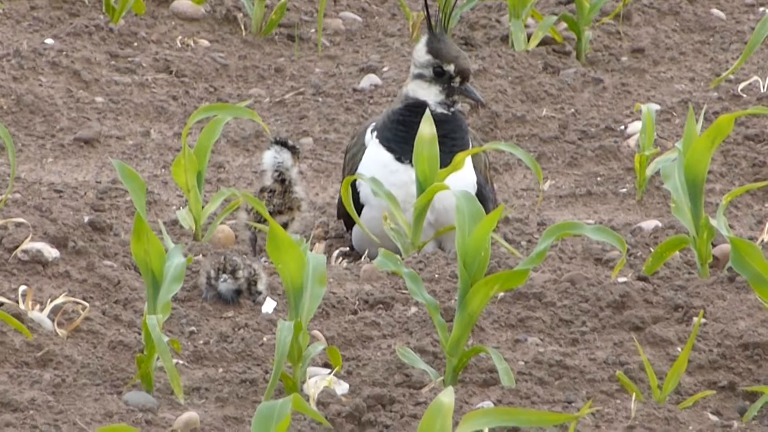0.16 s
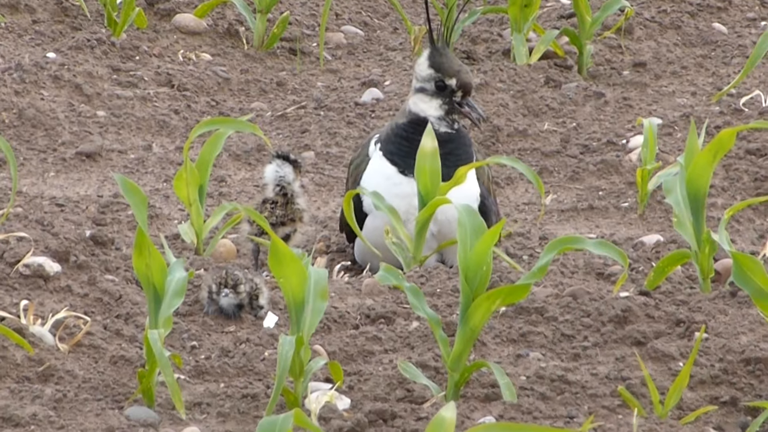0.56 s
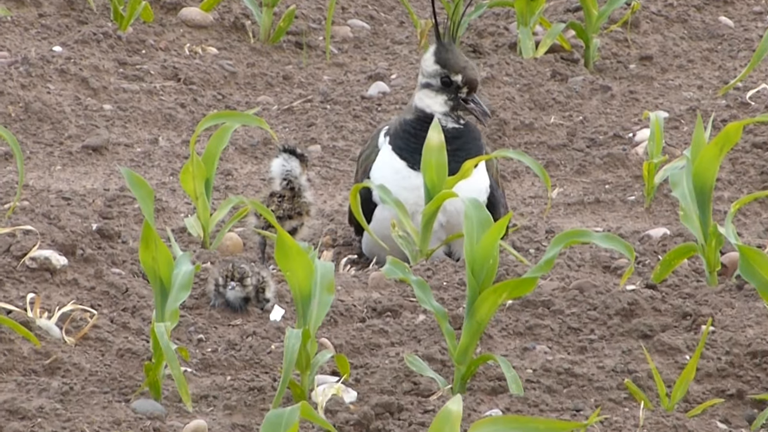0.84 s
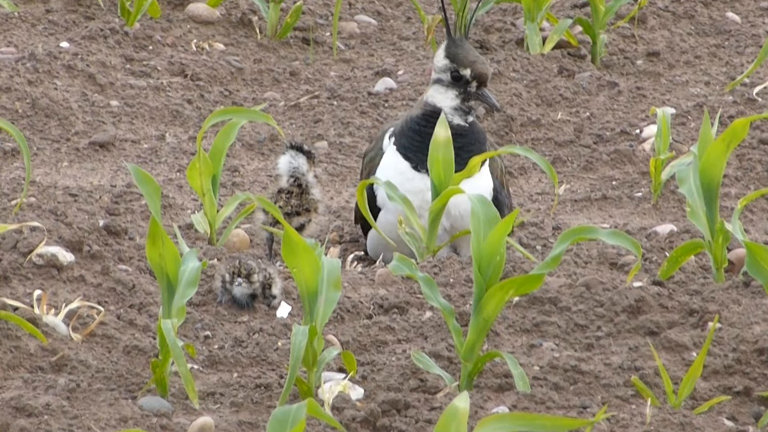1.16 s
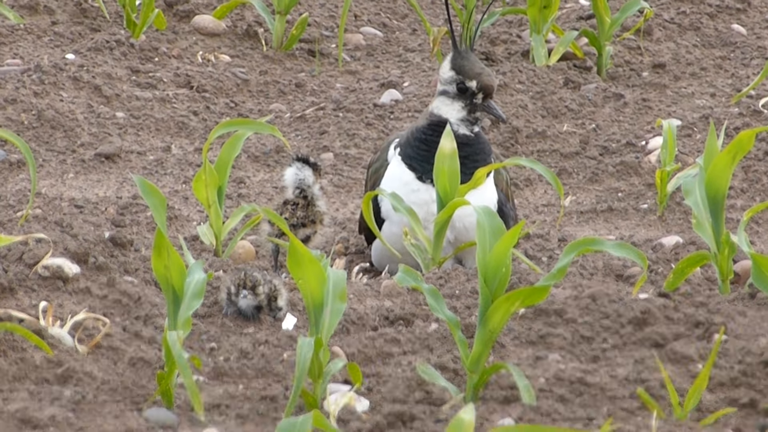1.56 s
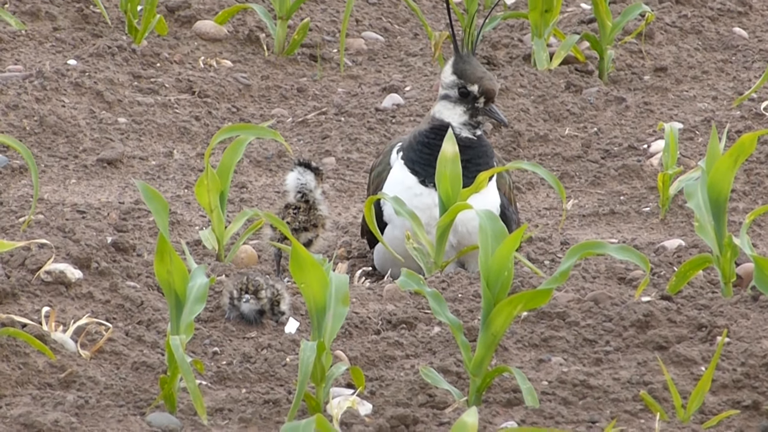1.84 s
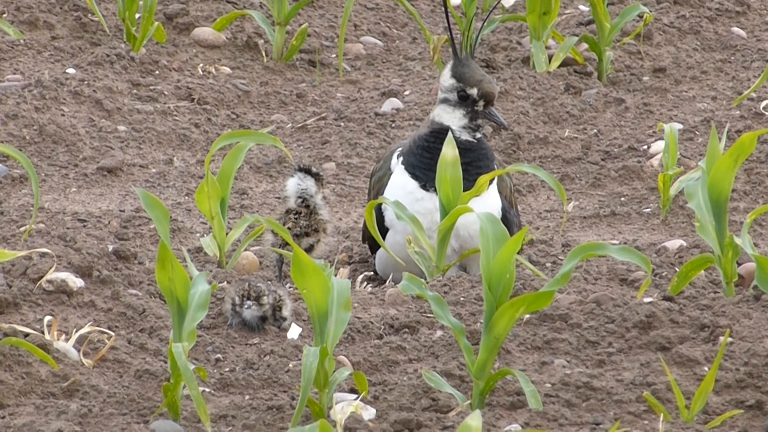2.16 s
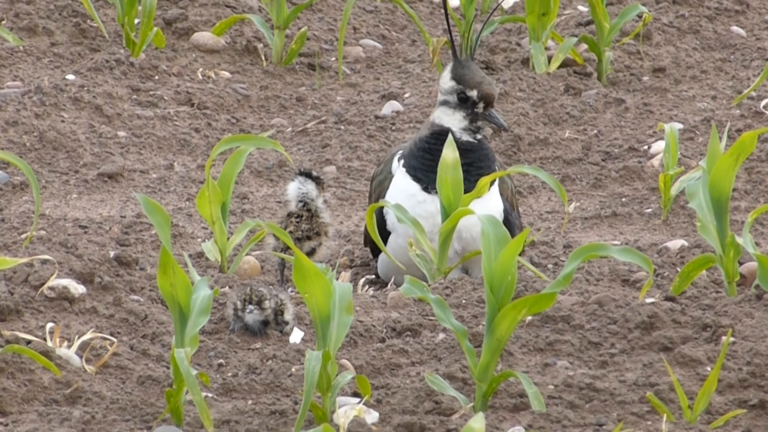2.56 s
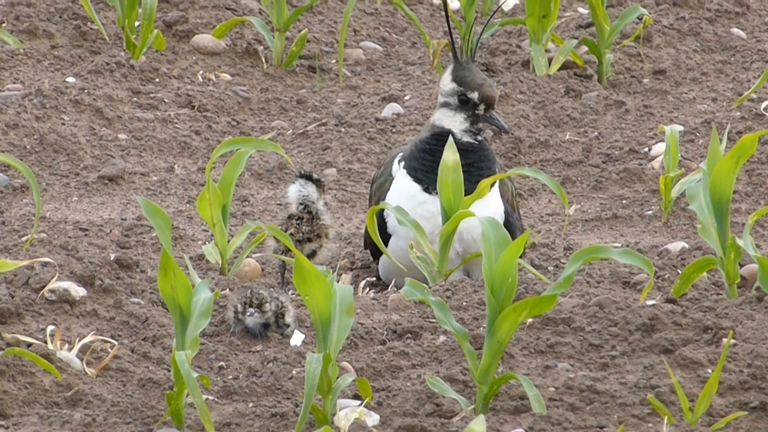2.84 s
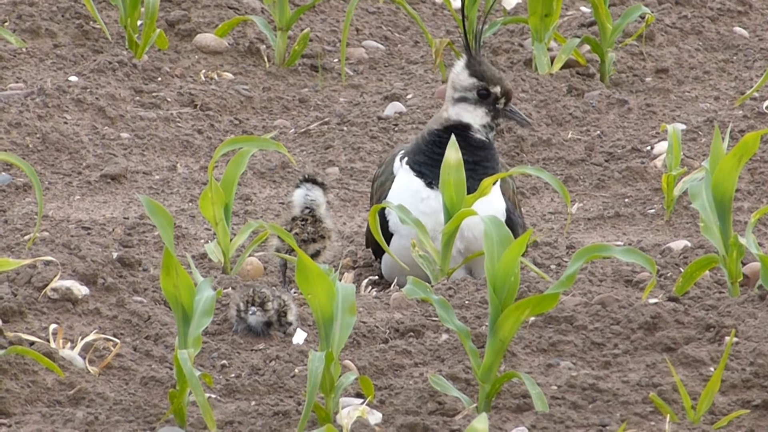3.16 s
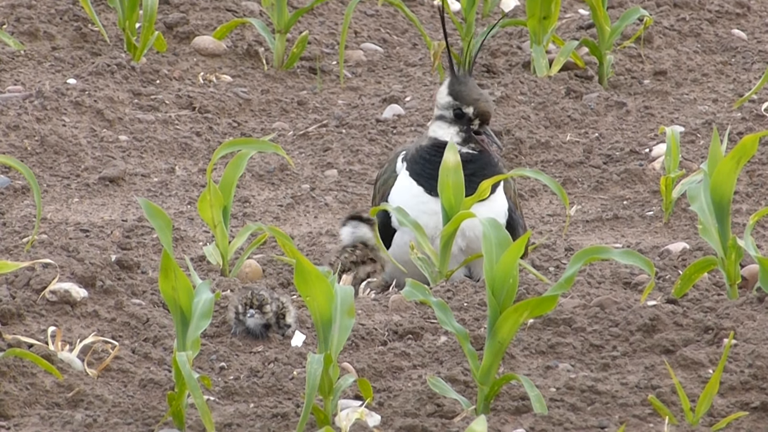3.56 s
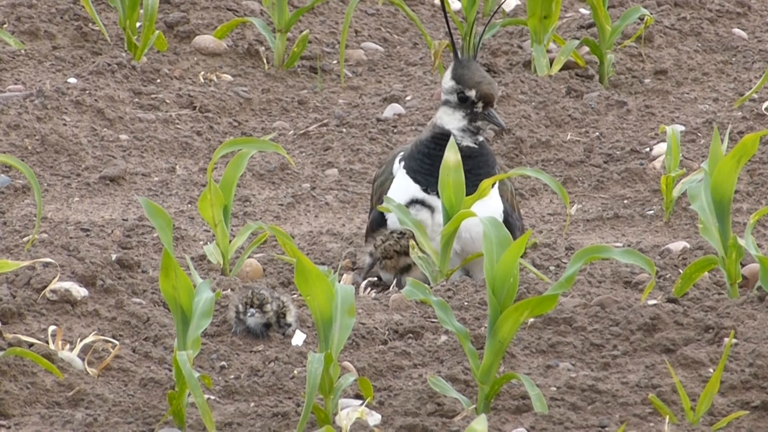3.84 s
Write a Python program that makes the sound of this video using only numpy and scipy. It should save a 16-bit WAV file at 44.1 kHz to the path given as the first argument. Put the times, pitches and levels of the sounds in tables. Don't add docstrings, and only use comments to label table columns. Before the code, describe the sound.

A lapwing gives two loud nasal two-part calls over a windy field with faint chick peeps

```python
import sys
import numpy as np
from scipy import signal
from scipy.fft import rfft, irfft, next_fast_len
from scipy.io import wavfile
from scipy.ndimage import uniform_filter1d, map_coordinates

SR = 44100
rng = np.random.default_rng(int(sys.argv[2]) if len(sys.argv) > 2 else 0)


def to_wav(s):
    ch = np.atleast_2d(s).T
    pcm = np.round(np.clip(ch, -1, 1) * 32767)
    wavfile.write(sys.argv[1], SR, pcm.astype(np.int16))


def attenuation_scalar(level_db):
    decades = np.asarray(level_db, float) / 20
    return 10 ** decades


N = 176400
TOP_HZ = 15750
MIDDLE_HZ = 1200


def along(points, hz):
    f, v = np.transpose(points)
    return np.interp(np.log(hz + 1), np.log(f + 1), v)


def unit(x):
    return x / np.sqrt(np.mean(x ** 2) + 1e-20)


def curves(rows):
    s, *cols = np.transpose(rows)
    return [np.interp(np.arange(N) / SR, s, c) for c in cols]


def gate(start, end, edge):
    t = np.arange(N) / SR
    return np.sin(np.pi / 2 * np.clip(np.minimum(t - start, end - t) / edge, 0, 1)) ** 2


def wobble(rate):
    return map_coordinates(rng.standard_normal(N // 20), [np.arange(N) * rate / SR])


def filtered(x, response):
    m = next_fast_len(N + SR // 2)
    return irfft(rfft(x, m) * response(np.fft.rfftfreq(m, 1 / SR)), m)[..., :N]


def peak(f, centre, width):
    return 1j * f * width / (centre ** 2 - f * f + 1j * f * width)


# start_s, pitch_hz
CALL_PITCH = [
    [(.585, 955), (.607, 1028), (.621, 1120), (.629, 1154), (.707, 1201), (.835, 1208), (.863, 1206),
     (.872, 1186)],
    [(.876, 1158), (.892, 1149), (.924, 1165), (.946, 1222), (1.012, 1307), (1.04, 1368)],
    [(1.045, 1383), (1.063, 1428), (1.074, 1447), (1.086, 1448), (1.1, 1421), (1.11, 1392), (1.121, 1348),
     (1.137, 1220), (1.16, 960)],
    [(3.31, 794), (3.332, 963), (3.354, 1020), (3.386, 1088), (3.466, 1099), (3.49, 1073), (3.5, 1107),
     (3.53, 1095), (3.555, 1134)],
    [(3.56, 1168), (3.574, 1157), (3.626, 1276), (3.724, 1392), (3.74, 1417)],
    [(3.745, 1432), (3.765, 1468), (3.776, 1481), (3.786, 1476), (3.8, 1432), (3.815, 1370), (3.827, 1298),
     (3.845, 1126), (3.865, 1010)],
]
# start_s, level_db, brightness_db_per_octave
EFFORT = [
    [(0.585, -40, 1), (0.6, -31.5, -1.5), (.622, -34.5, -1), (.71, -32, -1.5), (0.831, -32, -2),
     (0.875, -33, -3.5)],
    [(0.875, -36, -2), (0.893, -36.5, -5.5), (1.035, -28, 0.5), (1.083, -28.5, -2.5), (1.115, -25, 2),
     (1.139, -29.5, 2.5), (1.16, -44.5, 0)],
    [(3.31, -47, -9), (3.326, -37, 1), (3.362, -33, -3), (3.47, -34.5, -3), (3.56, -37, -2)],
    [(3.56, -36, -4.5), (3.714, -28.5, -0.5), (3.78, -28.5, -3.5), (3.816, -25.5, 2), (3.84, -28.5, 3),
     (3.865, -49.5, 0)],
]
# start_s, middle_resonance_db, upper_resonance_hz, upper_resonance_db, nasal_notch_hz
BILL_SHAPE = [
    [(.585, 7, 11300, -22, 10000), (.605, 2.5, 11100, -17, 10000), (.63, -15, 11500, -12, 9200),
     (.665, -7, 10300, -10, 8600), (.72, 2, 10400, 0.5, 8450), (.865, 2.5, 10460, 0.5, 8450)],
    [(.885, 0, 10600, -3, 8900), (.93, 5, 10500, 2, 8340), (.99, 0.5, 10550, 5.5, 8900),
     (1.05, -5, 11200, 1, 9100), (1.08, -6, 11160, 0, 9300), (1.11, -4.5, 10800, 1.5, 8900),
     (1.16, -0.5, 10700, -14, 9300)],
    [(3.31, 7, 10400, -26, 9500), (3.35, -7, 10700, -7, 9500), (3.39, -5.5, 11400, -5, 9300),
     (3.47, -1, 11400, -0.5, 9400), (3.55, -1.5, 11800, -5.5, 8900)],
    [(3.6, 1.5, 10800, 0, 8900), (3.66, 3.5, 11560, 1, 8900), (3.72, -2.5, 11060, 3.5, 9200),
     (3.78, 0.5, 11340, 3.5, 9400), (3.81, -6.5, 10940, 1.5, 8900), (3.865, 1.5, 10700, -17, 9200)],
]


def lapwing():
    edge_s, jitter_cycles, jitter_hz = .004, .11, 650
    breath_db, clear_breath, rattle_hz, rattle_db = -6.5, .08, 180, 6
    calls = (CALL_PITCH[:3:2], CALL_PITCH[3::2])
    sounding = sum(gate(first[0][0] - edge_s, last[-1][0] + 2 * edge_s, 2 * edge_s) for first, last in calls)
    hoarse = hoarseness(edge_s)
    tracks = curves(sum(CALL_PITCH, [])) + curves(sum(EFFORT, []))
    hz, effort_db, bright_db = [uniform_filter1d(c, size=200) for c in tracks]
    quaver_hz = 3.5 * wobble(45)
    phase = 2 * np.pi * (np.cumsum(hz + quaver_hz) / SR + hoarse * jitter_cycles * wobble(jitter_hz))

    now = sounding > 0
    k = np.arange(1, 19)[:, None]
    f = k * hz[now]
    wander_db = 2 * np.array([wobble(35)[now] for _ in k])
    source = attenuation_scalar(bright_db[now] * np.log2(f / PIPE[1][0]) + wander_db) * (f < TOP_HZ)
    bill = sum(BILL_SHAPE, [])
    throat = windpipe(f, hz[now], *[c[now] for c in curves(bill)])
    pulses = np.zeros(N)
    pulses[now] = np.sum(source * throat * np.exp(1j * k * phase[now]), axis=0).real
    pulses = pulses / np.sqrt(np.abs(uniform_filter1d(pulses ** 2, size=1500)) + 1e-9)

    puffs = (1 + np.cos(phase)) * rng.standard_normal(N)
    mean_bill = np.mean(bill, axis=0)[1:]
    breath = unit(filtered(puffs, lambda f: windpipe(f, MIDDLE_HZ, *mean_bill) * f))
    rattle = np.sin(2 * np.pi * rattle_hz * np.arange(N) / SR + 2 * wobble(50))
    rough_db = rattle_db * hoarse * rattle + 2.2 * hoarse * wobble(400) + 0.57 * wobble(60)
    voice = pulses * attenuation_scalar(rough_db) + attenuation_scalar(breath_db) * (hoarse + clear_breath) * breath
    return attenuation_scalar(effort_db + 1.2) * sounding * voice


# start_s, end_s, extra_hoarseness (0-1)
BREAKS = [(.578, .588, .3), (.66, .664, .06), (.877, .9, .16), (.9, .915, .22), (.915, .93, .14),
          (1.08, 1.098, .06), (1.11, 1.126, .08), (1.126, 1.148, .15), (1.148, 1.17, .55), (3.3, 3.322, .3),
          (3.481, 3.497, .2), (3.497, 3.508, .06), (3.508, 3.535, .24), (3.535, 3.556, .4),
          (3.556, 3.585, .17), (3.585, 3.62, .1), (3.815, 3.83, .08), (3.83, 3.85, .14), (3.85, 3.875, .55)]


def hoarseness(edge_s):
    breaks = sum(more * gate(a - edge_s, b + edge_s, 2 * edge_s) for a, b, more in BREAKS)
    return np.clip(.035 + breaks, 0, 1)


# centre_hz (at middle pitch), width_hz, level_db, power of pitch followed, growth_db_per_octave of pitch
PIPE = [(1427, 440, -7.5, 0.78, 0.5), (2450, 300, -4, 0, -12), (3600, 730, -1, 1, -1),
        (7454, 800, 3, 0.29, -4), (10900, 840, 1.5, 0, 3), (14870, 580, -18.5, 0.11, 45)]


def windpipe(f, hz, middle_db, upper_hz, upper_db, notch_hz):
    up = hz / MIDDLE_HZ
    shift = [1, 1, 1, 1, upper_hz / PIPE[4][0], 0.97]
    more_db = [0.068, 0.16, 0, middle_db, upper_db, 0]
    peaks = 0
    for i, (centre, width, db, power, grow_db) in enumerate(PIPE):
        gain = attenuation_scalar(db + grow_db * np.log2(up) + more_db[i])
        peaks = peaks + (-1) ** i * gain * peak(f, centre * shift[i] * up ** power, width)

    def hollow(depth, centre, width):
        return 1 - depth * peak(f, centre, width)

    above_notch = (1 + np.tanh((f - notch_hz) / 500)) / 2
    shade_db = .9 * np.minimum(upper_db + 9, 0) * above_notch
    throat = hollow(.65, 4700 * up ** .45, 800)
    nose = hollow(.8, notch_hz, 1170)
    gap = hollow(.95, 1.073 * upper_hz, 1400)
    return attenuation_scalar(shade_db) * peaks * throat * nose * gap


# start_s, length_s, from_hz, to_hz, level_db
PEEPS = [(0.342, 0.052, 4780, 4500, -64), (0.423, 0.017, 4440, 5500, -50.5), (0.524, 0.03, 3680, 6700, -62),
         (0.536, 0.02, 4530, 5500, -54.5), (.71, .02, 4600, 5300, -52), (1.432, 0.014, 3600, 4200, -54),
         (1.555, 0.026, 6220, 6300, -59.5), (1.688, 0.025, 5095, 5680, -61), (1.692, .018, 6250, 6600, -64),
         (1.761, 0.023, 3590, 4100, -56.5), (1.819, 0.013, 4470, 5300, -53.5),
         (0.311, 0.047, 3300, 5030, -63), (2.085, .015, 4650, 5300, -60), (2.21, .015, 6000, 6130, -65),
         (2.308, 0.044, 4450, 5580, -56), (2.401, 0.02, 6400, 6430, -65), (2.46, 0.033, 5600, 5440, -61),
         (2.639, 0.053, 8800, 5960, -58.5), (2.692, 0.011, 4530, 5230, -56),
         (2.703, 0.004, 5380, 6200, -55), (2.964, 0.013, 3480, 4230, -58), (3.01, 0.016, 4330, 5300, -54.5),
         (3.239, 0.024, 4870, 6000, -57), (3.234, 0.0126, 6073, 6400, -57)]


def small_birds():
    out = np.zeros(N)
    for s, length, from_hz, to_hz, db in PEEPS:
        u = np.arange(round(length * SR)) / SR / length
        hz = from_hz + (to_hz - from_hz) * u * (1.5 - .5 * u)
        swell = np.sin(np.pi * u) * attenuation_scalar(2.5 * wobble(255)[:len(u)])
        out[round(s * SR):][:len(u)] += attenuation_scalar(db + 9.0) * swell * np.sin(2 * np.pi * np.cumsum(hz) / SR)
    return out


# start_s, pitch_hz, level_db
FAR = [
    (2.131, 2450, -60),
    (2.2, 2780, -54),
    (2.3, 2950, -55),
    (2.41, 2990, -58),
    (2.5, 2950, -56),
    (2.57, 2850, -67),
]


def far_lapwing():
    hz, db = curves(FAR)
    level = attenuation_scalar(db + 1.5 * wobble(30.2)) * gate(FAR[0][0], FAR[-1][0], .02)
    return level * np.sin(2 * np.pi * np.cumsum(hz + 25 * wobble(60)) / SR)


def tick():
    start_s, level_db, centre_hz, width_hz, t60_s = 2.769, -32, 9800, 2400, .008
    t = np.arange(N) / SR
    snap = (t >= start_s) * attenuation_scalar(level_db - 60 * np.abs(t - start_s) / t60_s) * rng.standard_normal(N)
    return filtered(snap, lambda f: peak(f, centre_hz, width_hz) ** 2)


def field(x):
    t60_s, delay_s, spread = 0.17, .004, .3
    t = np.arange(SR // 4) / SR
    tail = rng.standard_normal((2, len(t))) * attenuation_scalar(-60 * t / t60_s) * (t > delay_s)
    tail = tail[0] + spread * np.array([[1], [-1]]) * tail[1]
    return signal.fftconvolve(x[None], tail / np.linalg.norm(tail[0]), axes=1)[:, :N]


# start_s, strength_db
WIND = [(.3, -40.5), (.7, -40), (2, -40), (2.7, -39.3), (3.2, -38.8), (4, -38.8)]
# frequency_hz, density_db per Hz
ROAR = [(28, -36), (45, -33), (75, -12), (130, -2), (280, -3), (800, 0.5), (1250, -4), (2400, -43.5)]
# frequency_hz, density_db per Hz
HISS = [(880, -68), (1500, -1), (4350, -13), (5290, -16.5), (7770, -23.5), (9010, -24.5), (14000, -36),
        (15800, -71)]


def wind():
    strength_db, = curves(WIND)
    gust_db = strength_db - strength_db.mean()
    roar_db = 3 + gust_db + .5 * wobble(6.14) + .4 * wobble(17)
    hiss_db = -6.5 + gust_db + .3 * wobble(8.1)
    roar = attenuation_scalar(roar_db) * rush(ROAR, patchy_db=0.44)
    hiss = attenuation_scalar(hiss_db) * rush(HISS, patchy_db=-1.15)
    return attenuation_scalar(strength_db.mean()) * (roar + hiss)


# frequency_hz, left_right_likeness (0-1)
ALIKE = [(60, 0.98), (130, 1.0), (290, 0.99), (640, 0.98), (1410, 0.74), (3100, 0.76), (6820, 0.55),
         (15000, 0.42)]
# frequency_hz, left_minus_right_db
LEAN = [(60, -0.5), (150, 0), (380, -0.5), (950, -3), (2380, -4.5), (5980, -5), (15000, 1.5)]


def rush(spectrum, patchy_db):
    z = signal.stft(rng.standard_normal((2, N)), nperseg=512)[2]
    patches = rng.standard_normal(z.shape[1:])
    patches = uniform_filter1d(uniform_filter1d(patches, 6, 0), 14, 1)
    pair = signal.istft(z * attenuation_scalar(patchy_db * unit(patches)), nperseg=512)[1][:, :N]

    def mid_side(hz):
        turn = np.arccos(np.clip(along(ALIKE, hz), -1, 1)) / 2
        return attenuation_scalar(along(spectrum, hz)) * [np.cos(turn), np.sin(turn)]

    def lean(hz):
        return attenuation_scalar(along(LEAN, hz) * np.array([[.5], [-.5]]))

    mid, side = filtered(pair, mid_side)
    return unit(filtered(np.array([mid + side, mid - side]), lean))


def scene():
    pan_db, echo_db = 1.9, -18
    birds = lapwing() + small_birds() + far_lapwing() + tick()
    direct = birds * attenuation_scalar([[pan_db / 2], [-pan_db / 2]])
    return direct + attenuation_scalar(echo_db) * field(birds) + wind()


def low_pass(x):
    return signal.sosfilt(signal.butter(12, 16160, fs=SR, output="sos"), x)


def record(dry):
    dip_hz, dip_width_hz, dip_depth, top_fade_hz = 9100, 900, .74, 900
    start_s, rise_s = .305, .007

    def microphone(f):
        band = np.clip((TOP_HZ - f) / top_fade_hz, 0, 1) ** .5
        return (1 - dip_depth * peak(f, dip_hz, dip_width_hz)) * band

    heard = filtered(dry, microphone) * gate(start_s, np.inf, rise_s)
    return low_pass(heard)


dry = scene()
out = record(dry)
to_wav(out)
```